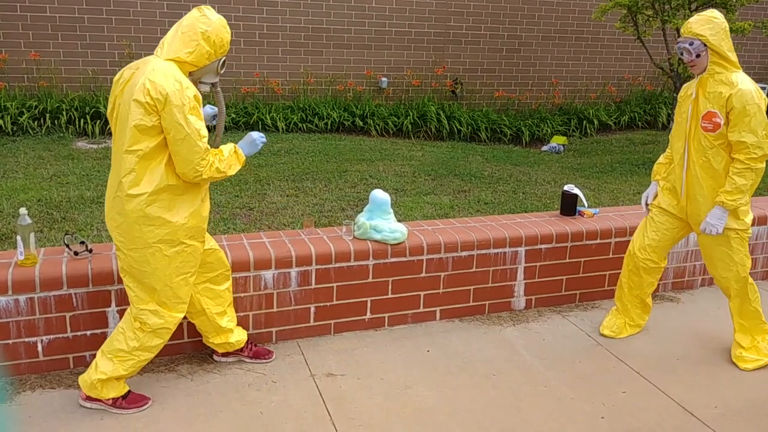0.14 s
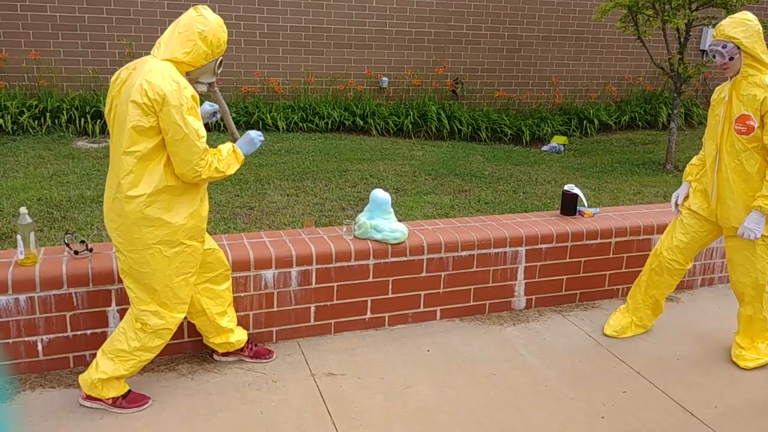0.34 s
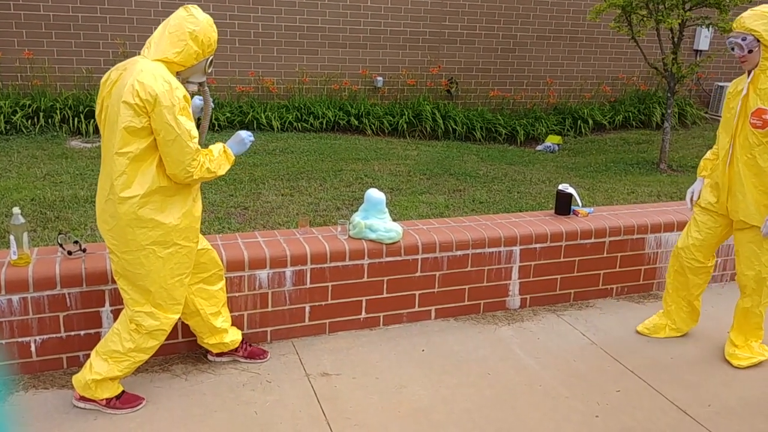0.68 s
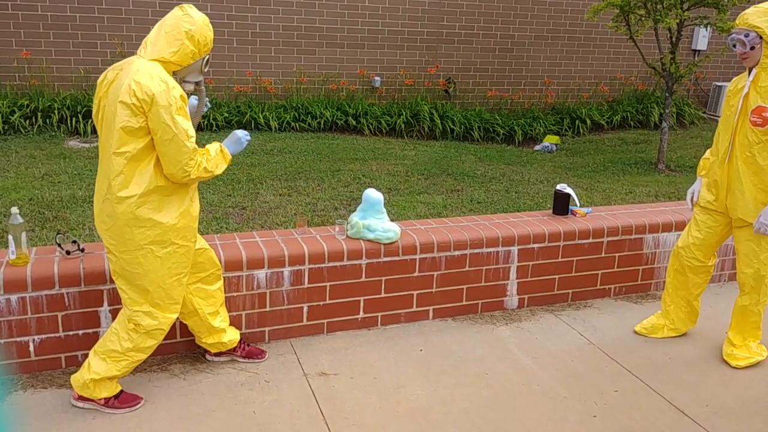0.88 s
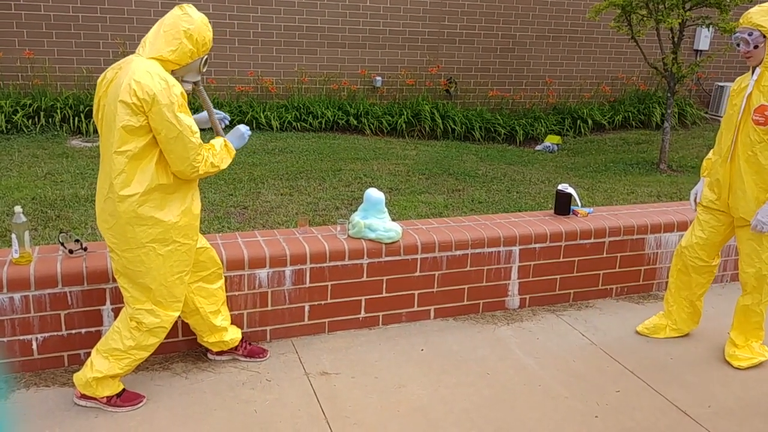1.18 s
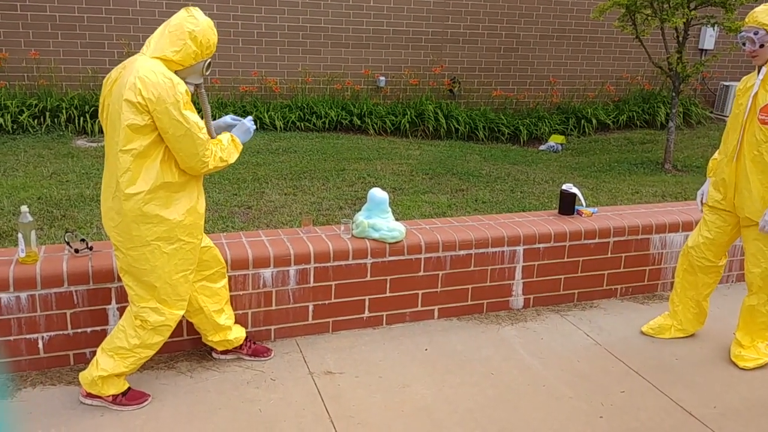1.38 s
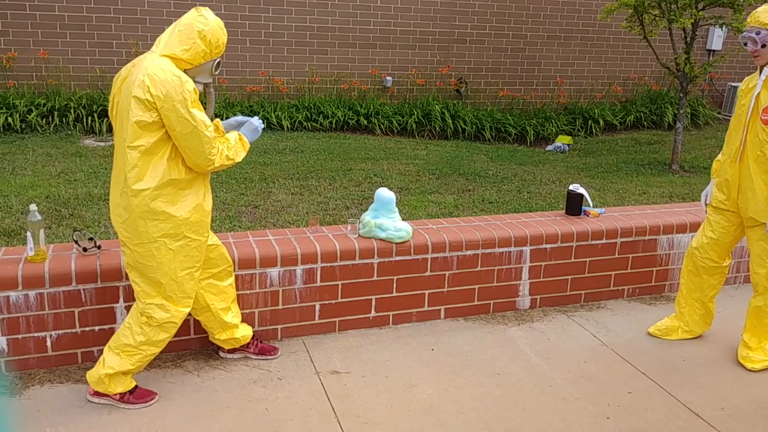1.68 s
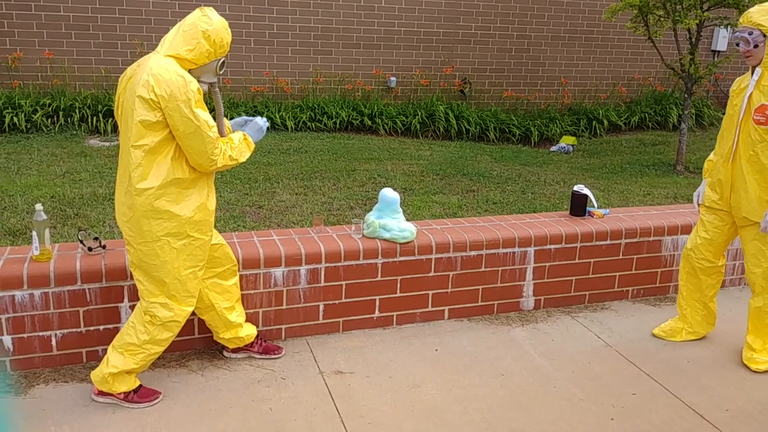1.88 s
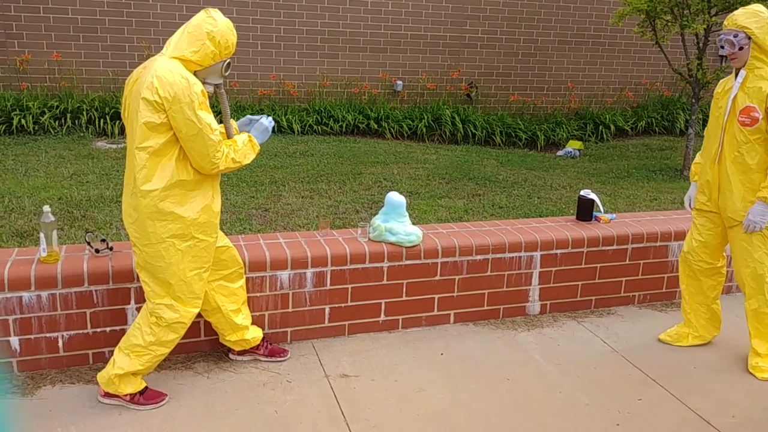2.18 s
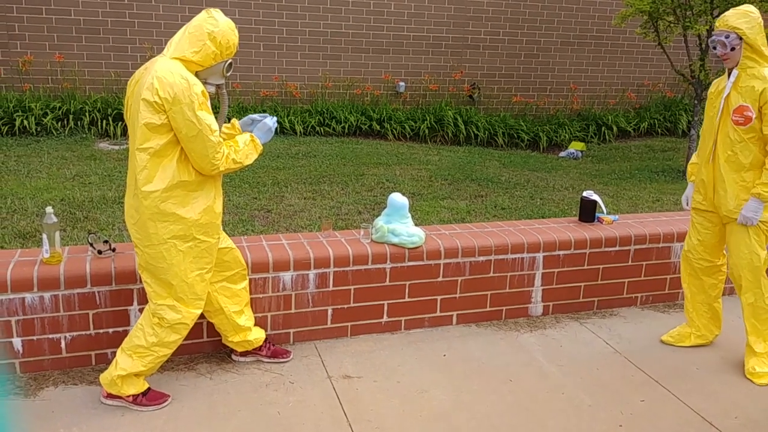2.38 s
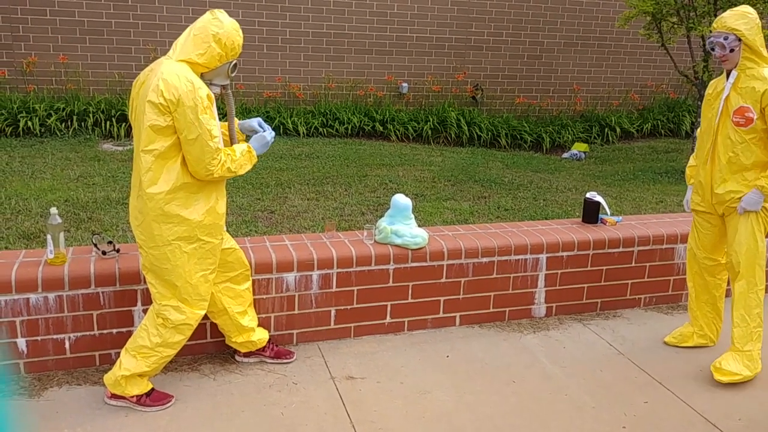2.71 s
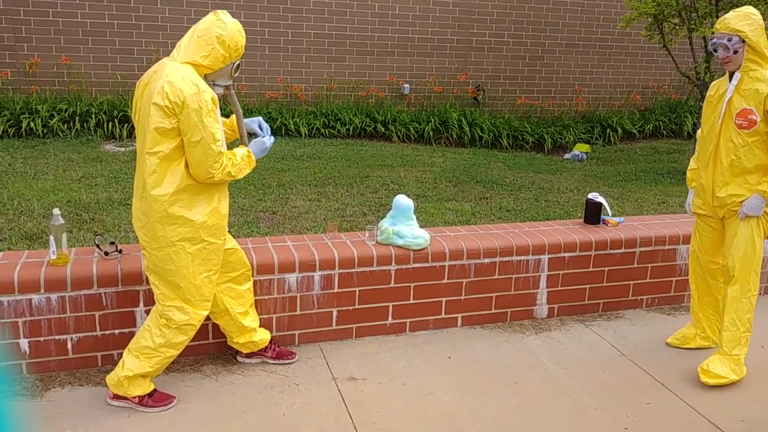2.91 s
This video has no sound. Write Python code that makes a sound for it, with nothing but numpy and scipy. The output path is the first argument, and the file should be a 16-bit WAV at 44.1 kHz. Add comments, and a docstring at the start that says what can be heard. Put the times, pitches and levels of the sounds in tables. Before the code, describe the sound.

Matches rattle briefly in a cardboard box outdoors, with faint birds and distant traffic.

```python
"""Matches clatter and scrape in their cardboard box, each impact exciting its damped resonances.
They are handled outdoors by a brick wall, by someone whose plastic coverall rustles in tiny crinkles;
earlier, a shoe scuffs over concrete by stick-slip friction. A songbird repeats a falling whistle
among higher chirps, and a distant engine speeds up over a low hum and the rumble of far traffic."""
import sys
import numpy as np
from scipy import signal
from scipy.fft import rfft, irfft, next_fast_len
from scipy.io import wavfile
from scipy.ndimage import uniform_filter1d

SR = 44100
rng = np.random.default_rng(int(sys.argv[2]) if len(sys.argv) > 2 else 0)


def to_wav(s):
    """Save 16-bit WAV."""
    ch = np.atleast_2d(s).T  # columns
    pcm = np.round(np.clip(ch, -1, 1) * 32767)  # PCM
    wavfile.write(sys.argv[1], SR, pcm.astype(np.int16))


N = 134505
T = np.arange(N) / SR

# Impacts of the matches: t/s, level/dB, treble gain/dB
IMPACTS = [(2.3492, -24.5, -8), (2.3739, -23.5, 4), (2.408, -37, 13), (2.4431, -28, 5.5),
           (2.4496, -24.5, -4), (2.4583, -16.5, 3.5), (2.4606, -21, 0), (2.468, -24, 4),
           (2.4786, -16.5, 8.5), (2.482, -25, 5), (2.484, -27, 1), (2.4874, -18, 1), (2.4968, -18.5, -1),
           (2.5002, -18.5, -1), (2.513, -21.5, -16), (2.5185, -31, -9), (2.5412, -15.5, -1),
           (2.57, -25, -4), (2.5734, -13.5, -11), (2.577, -23.5, -16), (2.583, -21, -11.5), (2.6, -24, -13)]
# Modes of the box: f/Hz, bandwidth/Hz, gain/dB
BOX_MODES = [(1342, 130, -10.5), (1930, 99, -9), (2490, 254, -0.5), (2820, 300, 0), (3480, 110, 4),
             (4130, 500, -7), (5900, 690, -5.5), (7570, 1050, -1.5)]
# Left-right coherence of near sources: f/Hz, coherence
NEAR_COHERENCE = [(300, 1), (1400, 0.91), (6000, 0.34)]
TICK_DECAY_S, SCRAPE_DECAY_S, SCRAPE_DB = 0.0008, 0.01, -12
MODE_DETUNE, MODE_SPREAD_DB, TREBLE_HZ = 0.017, 2, 6200


def matchbox(size=4096):
    """Modal resonance: a tick and a gritty scrape drive box modes that shift from impact to impact."""
    contact = stereo_noise(NEAR_COHERENCE)
    contact /= np.sqrt(uniform_filter1d(contact ** 2, size=32, axis=-1) + 1e-12)
    grit = grains(per_s=1800, spread_db=0.5)
    age, out = T[:size], np.zeros((2, N))
    for s, db, treble_db in IMPACTS:
        span = slice(int(s * SR), int(s * SR) + size)
        scrape = from_db(SCRAPE_DB) * np.exp(-age / SCRAPE_DECAY_S) * grit[span]
        force = from_db(db) * contact[:, span] * np.hypot(np.exp(-age / TICK_DECAY_S), scrape)
        knock = from_db(-12) * force  # direct crack of the contact
        for hz, width, mode_db in BOX_MODES:
            detune, strength = rng.standard_normal(2)
            radius = np.exp(-np.pi * width / SR)
            angle = 2 * np.pi * hz * (1 + MODE_DETUNE * detune) / SR
            ring = signal.lfilter([1, 0, -1], [1, -2 * radius * np.cos(angle), radius ** 2], force)
            knock += from_db(mode_db + MODE_SPREAD_DB * strength) * (1 - radius ** 2) / 2 * ring
        body = signal.lfilter(*signal.butter(1, TREBLE_HZ, fs=SR), knock)
        out[:, span] += body + from_db(treble_db) * (knock - body)
    return out + from_db(-10) * reverberation(out, t60_s=0.63, build_s=0.0032)


# Envelope of the scuff: t/s, level/dB
SCUFF_ENVELOPE = [(.41, -65), (.46, -42.5), (.5, -35.5), (.555, -30.5), (.6, -32), (.657, -32), (.675, -45),
                  (.71, -58), (.76, -66.5)]
# Its spectrum: f/Hz, gain/dB
SCUFF_SPECTRUM = [(100, -8), (300, 3), (600, 6.5), (1500, 1), (2700, -1), (4000, -1.5), (7500, 1.5),
                  (16000, 4)]


def shoe():
    """Stick-slip friction: grit rolls and slips under a dragged sole."""
    db, = in_time(SCUFF_ENVELOPE)
    slips = from_db(db) * grains(per_s=7000, spread_db=0) * stereo_noise(NEAR_COHERENCE)
    return colour(slips, per_hz(SCUFF_SPECTRUM))


# Folds of suit and gloves rubbing: peak t/s, level/dB, rise/s, fall/s
RUSTLES = [(.005, -48.5, 0.012, 0.024), (0.083, -46.5, 0.04, 0.037), (0.18, -42.5, 0.024, 0.05),
           (.26, -47.5, 0.016, 0.011), (0.311, -53.5, 0.019, 0.054), (2.39, -49.5, 0.043, 0.062),
           (2.59, -45.5, 0.086, 0.043), (2.665, -44.5, 0.018, 0.03), (2.738, -42.5, 0.046, 0.059),
           (2.81, -52.5, 0.037, 0.013), (3.0, -52, 0.018, 0.2)]
# Their spectrum: f/Hz, gain/dB
RUSTLE_SPECTRUM = [(100, 6.5), (650, 15.7), (1400, 12.3), (2500, 6.7), (5000, 2), (8000, 7.1), (16000, 6.7)]
# Single creases snapping: t/s, level/dB
SNAPS = [(0.326, -63), (.368, -44.5), (0.771, -37), (0.7835, -44), (1.304, -49.5)]
SNAP_DECAY_S = 0.0019


def suit():
    """Incoherent addition: swells of small crinkles sum in power; now and then one crease snaps."""
    power = sum(from_db(db) ** 2 * np.exp(-2 * np.maximum((s - T) / rise, (T - s) / fall))
                for s, db, rise, fall in RUSTLES)
    crinkles = np.sqrt(power) * grains(per_s=3500, spread_db=0.5) * stereo_noise(NEAR_COHERENCE)
    snaps = sum((T > s) * from_db(db) * np.exp(-np.abs(T - s) / SNAP_DECAY_S) for s, db in SNAPS)
    return colour(crinkles, per_hz(RUSTLE_SPECTRUM)) + snaps * stereo_noise(NEAR_COHERENCE)


# Slurs of one whistle: onset t/s, duration/s, start, middle and end f/Hz, level/dB, relative waver
WHISTLE_SLURS = [(0, 0.14, 4080, 3570, 3200, -8.5, 0.0228), (0.132, 0.12, 3420, 3090, 2814, -3, .002),
                 (0.257, 0.0317, 2800, 2650, 2480, -6, .003), (.32, .26, 2460, 2003, 1746, -11, 0.0385)]
# Repeats of the whistle: t/s, level/dB
WHISTLE_REPEATS = [(1.06, -57.5), (1.87, -55), (2.649, -52)]
# Single chirps; the first is a short fragment of the falling whistle, and the last adds a slur to its third
# repeat: t/s, duration/s, start, middle and end f/Hz, level/dB
CHIRPS = [(0.329, 0.082, 3310, 3156, 3002, -62.5), (0.909, 0.074, 6060, 5450, 4330, -72),
          (0.958, 0.093, 6800, 5000, 5000, -63.5), (1.164, 0.078, 7660, 6930, 6400, -67),
          (1.203, 0.064, 6700, 5380, 4420, -65.5), (1.407, 0.055, 7980, 7280, 6400, -71),
          (1.471, 0.039, 6600, 5220, 4250, -63), (1.576, 0.24, 5312, 5190, 5380, -71.5),
          (1.652, 0.023, 6560, 7000, 7230, -65.5), (1.75, 0.07, 5440, 4850, 4440, -61),
          (1.774, 0.065, 6600, 5380, 4880, -58), (1.816, 0.018, 6750, 7060, 7200, -67),
          (1.778, 0.15, 5430, 5380, 5270, -69.5), (2.016, 0.049, 6187, 5320, 4650, -66.5),
          (2.105, 0.043, 6040, 5950, 5660, -64), (2.15, 0.096, 4876, 4500, 4720, -58),
          (2.408, .035, 3780, 3450, 3290, -55), (2.693, 0.04, 3800, 3520, 3140, -46)]
# Reflections from walls: delay/s, gain/dB
WALL_ECHOES = [(.019, -10), (.042, -14)]
CHIRP_WAVER = 0.063  # share of a chirp's sweep


def birds():
    """Multipath propagation: whistles and chirps arrive directly, off walls and scattered by a hedge."""
    song = sum(bird_note(s + after, length, *pitches, db + slur_db, waver)
               for s, db in WHISTLE_REPEATS for after, length, *pitches, slur_db, waver in WHISTLE_SLURS)
    for s, length, start_hz, middle_hz, end_hz, db in CHIRPS:
        waver = CHIRP_WAVER * abs(start_hz - end_hz) / middle_hz
        song += bird_note(s, length, start_hz, middle_hz, end_hz, db, waver) * flutter(depth_db=3.5)
    song *= flutter(depth_db=2)
    echoes = sum(from_db(db) * np.interp(T - delay, T, song, left=0) for delay, db in WALL_ECHOES)
    hedge = reverberation(song, t60_s=0.25, build_s=0.015)
    return from_db(-2) * song + echoes + from_db(-6) * hedge


def bird_note(s, length, start_hz, middle_hz, end_hz, db, waver):
    """Frequency modulation: a trembling tone glides along a parabola as it swells and fades."""
    progress = np.clip((T - s) / length, 0, 1)
    hz = np.polyval(np.polyfit([0, .5, 1], [start_hz, middle_hz, end_hz], 2), progress)
    swell = 2 * np.sqrt(progress * (1 - progress))
    return from_db(db) * swell * tone(hz * (1 + waver * drift(rate_hz=150)))


# Distant engine: t/s, firing f/Hz, level/dB
ENGINE_RUN = [(0, 80, -44.5), (.21, 78.24, -38), (.48, 74.9, -52), (.57, 75.8, -41.5), (.77, 77.5, -51),
              (.85, 78.35, -34), (.94, 79.24, -35.5), (.98, 84, -37.5), (1.03, 89, -64), (1.08, 86, -39),
              (1.4, 112.3, -48.5), (1.58, 118.6, -44), (1.67, 124.4, -62.5), (1.8, 135.2, -46.5),
              (2.8, 138.1, -44.5), (2.89, 134.8, -52)]
# Other low drones: start and end t/s, start and end f/Hz, level/dB
DRONES = [(-.2, 1.625, 145, 144.1, -56), (-.2, 3.5, 213, 212.9, -63), (-.2, 0.91, 110, 107.1, -54.5),
          (1.351, 2.15, 57.5, 59.7, -57), (2.299, 3.2, 65.8, 72, -47.5), (1.899, 3.2, 92.2, 92.7, -51.5)]
DRONE_FADE_S, HUM_WAVER_DB = 0.15, 2.5


def engines():
    """Periodic firing: an engine's pitch rises with its speed, while other drones come and go."""
    hz, db = in_time(ENGINE_RUN)
    hum = from_db(db + HUM_WAVER_DB * drift(rate_hz=7.6)) * tone(hz)
    for start, end, start_hz, end_hz, level_db in DRONES:
        fade = np.clip(np.minimum(T - start, end - T) / DRONE_FADE_S, 0, 1)
        gain = from_db(level_db + HUM_WAVER_DB * drift(rate_hz=20))
        hum += fade * gain * tone(np.interp(T, [start, end], [start_hz, end_hz]))
    return hum * from_db([[3], [-3]])  # louder on the left


# Spectrum of far traffic and air: f/Hz, relative level/dB
AIR_SPECTRUM = [(25, -29.5), (40, -19), (60, 5), (90, 13.5), (200, -2), (370, -7.5), (600, -15.5),
                (1100, -23.5), (2200, -28.5), (4000, -30), (7800, -41), (9500, -44), (16000, -38)]
# Its balance: f/Hz, left minus right level/dB
AIR_BALANCE = [(700, 3), (2380, 1), (4400, 8), (8000, 0.5)]
# Its left-right coherence: f/Hz, coherence
AIR_COHERENCE = [(30, 0.15), (70, 0.9), (400, 0.7), (2400, 0)]


def air():
    """Stationary noise: far traffic rumbles under a faint hiss."""
    left, right = from_db(-47) * rms_one(colour(stereo_noise(AIR_COHERENCE), per_hz(AIR_SPECTRUM)))
    lean_db = per_hz(AIR_BALANCE) / 2
    return np.vstack([colour(left, lean_db), colour(right, -lean_db)])


def reverberation(x, t60_s, build_s):
    """Diffuse scattering from paving, walls and hedge builds up, then decays exponentially."""
    envelope = from_db(-60 * T / t60_s) * (1 - np.exp(-T / build_s))
    return convolve(x, rng.standard_normal((2, N)) * envelope / np.sqrt(np.sum(envelope ** 2)))


def grains(per_s, spread_db):
    """Shot noise: an envelope of random slips, each decaying in a fraction of a millisecond."""
    sizes = from_db(spread_db * np.minimum(rng.exponential(1, N), 5))
    slips = sizes * (rng.random(N) < per_s / SR)
    return rms_one(np.sqrt(signal.lfilter([1], [1, -.88], slips ** 2 + 1e-12)))


def stereo_noise(coherence):
    """Partial coherence: independent mid and side noises mix into two white channels."""
    alike = np.clip(per_hz(coherence), -.98, .98)
    mid, side = (colour(rng.standard_normal(N), 10 * np.log10((1 + sign * alike) / 2))
                 for sign in (1, -1))
    return mid + side * [[1], [-1]]


def tone(hz):
    """A sine whose phase is the integral of its frequency."""
    return np.sqrt(2) * np.sin(2 * np.pi * (np.cumsum(hz) / SR + rng.random()))


def flutter(depth_db):
    """Amplitude modulation: quick, uneven swings of level."""
    return from_db(depth_db * drift(rate_hz=54))


def drift(rate_hz):
    """Random fluctuation: low-pass noise of unit rms."""
    size = next_fast_len(2 * N, real=True)
    hz = np.fft.rfftfreq(size, 1 / SR)
    return rms_one(irfft(rfft(rng.standard_normal(size)) / (1 + (hz / rate_hz) ** 2))[:N])


def colour(x, db):
    """Minimum-phase filtering: folding the cepstrum makes the gain curve causal."""
    cepstrum = irfft(np.log(from_db(db)))
    half = len(db) - 1
    folded = np.r_[cepstrum[0], 2 * cepstrum[1:half], np.zeros(half)]
    return convolve(x, irfft(np.exp(rfft(folded))))


def convolve(x, response):
    """Convolution with an impulse response."""
    return signal.fftconvolve(np.atleast_2d(x), np.atleast_2d(response), axes=-1)[:, :N]


def per_hz(points, size=8192):
    """Interpolation of (f/Hz, value) points over log frequency."""
    hz, value = np.transpose(points)
    return np.interp(np.log(np.fft.rfftfreq(size, 1 / SR) + 1), np.log(hz), value)


def in_time(rows):
    """Linear interpolation of each column over time."""
    s, *columns = np.transpose(rows)
    return [np.interp(T, s, column) for column in columns]


def from_db(db):
    """Decibels to amplitude ratio."""
    return 10 ** (np.asarray(db) / 20)


def rms_one(x):
    """Normalisation to unit rms."""
    return x / np.sqrt(np.mean(x ** 2) + 1e-20)


# Responses of the two microphones: f/Hz, gain/dB
LEFT_RESPONSE = [(400, 1.5), (650, -11), (900, -2), (1950, -2), (2150, -9), (2650, 8), (3150, -1),
                 (4200, 3.5), (5600, 0.5), (6800, 2), (7800, 5.5), (9300, -10), (10000, -50),
                 (11700, -30.5), (15500, -20.5)]
RIGHT_RESPONSE = [(400, -6), (650, -15.5), (850, -5), (1250, -6), (1680, -14.5), (2000, -1.5), (2330, 8),
                  (2900, 6.5), (3800, -2.5), (5900, -10), (7000, -24), (10000, -36.5), (15500, -33)]


def scene():
    """Superposition: near sounds and birds, coloured by two unlike microphones, add to the background."""
    left, right = matchbox() + shoe() + suit() + birds()
    foreground = np.vstack([colour(left, per_hz(LEFT_RESPONSE)), colour(right, per_hz(RIGHT_RESPONSE))])
    return foreground + engines() + air()


def record(dry, cutoff_hz=15750):
    """Band limiting: an elliptic low-pass cuts the top steeply."""
    return signal.sosfilt(signal.ellip(12, .1, 80, cutoff_hz, fs=SR, output="sos"), dry)


dry = scene()
out = record(dry)
to_wav(out)
```